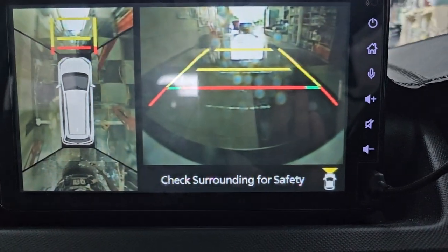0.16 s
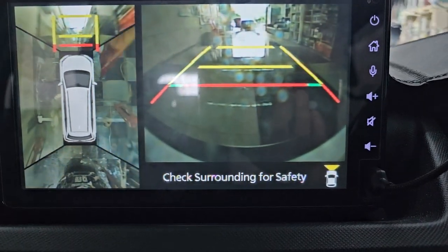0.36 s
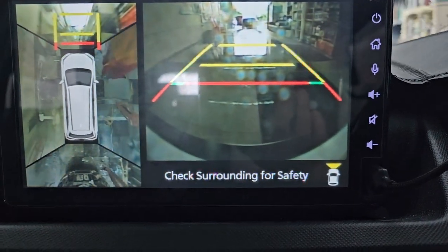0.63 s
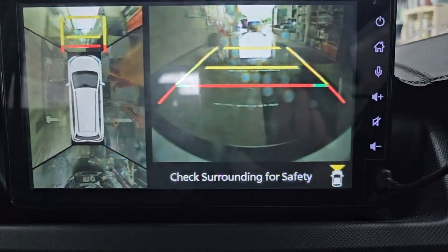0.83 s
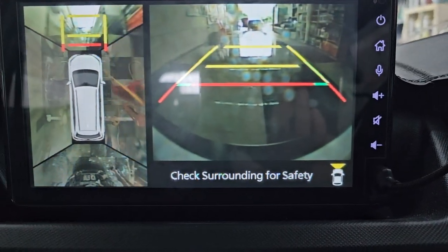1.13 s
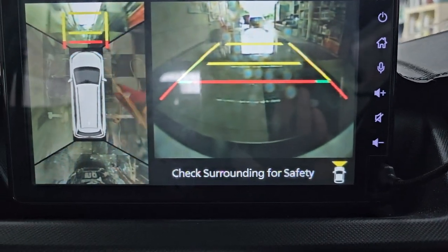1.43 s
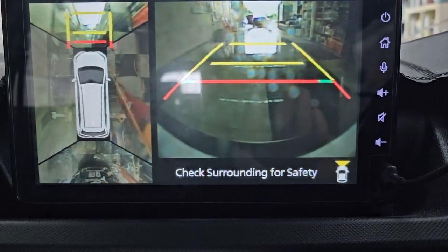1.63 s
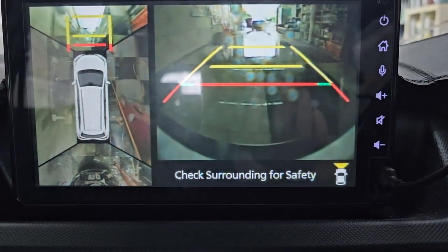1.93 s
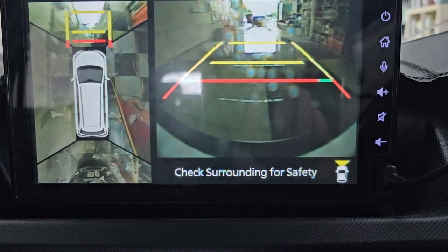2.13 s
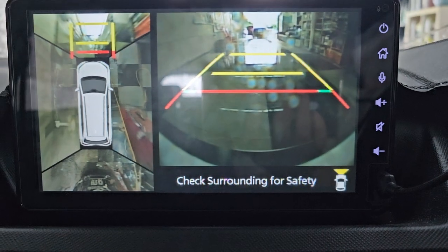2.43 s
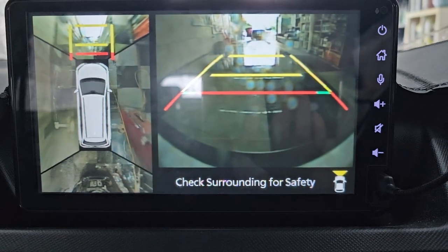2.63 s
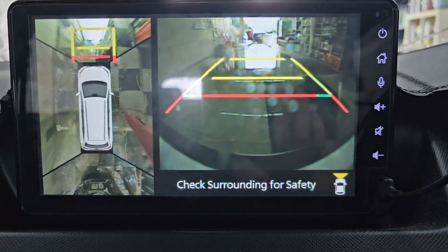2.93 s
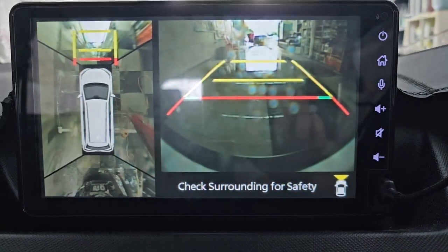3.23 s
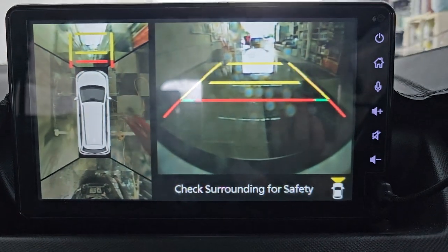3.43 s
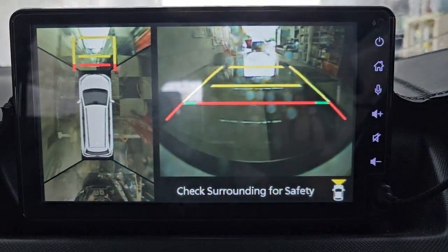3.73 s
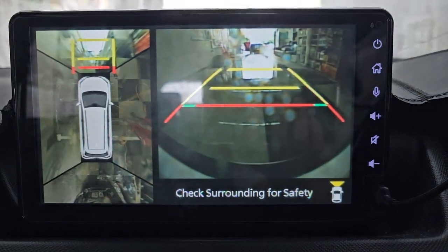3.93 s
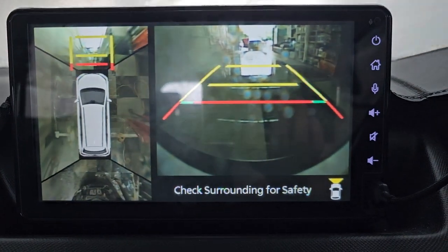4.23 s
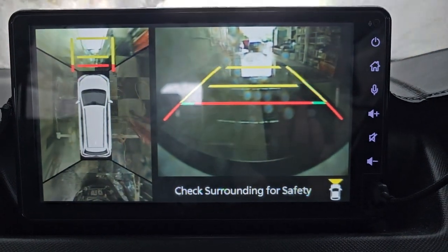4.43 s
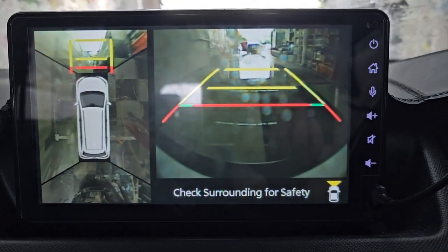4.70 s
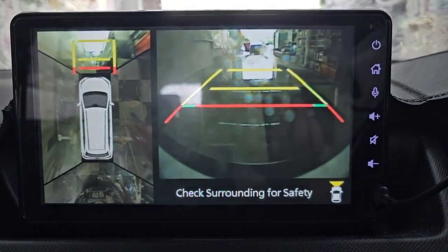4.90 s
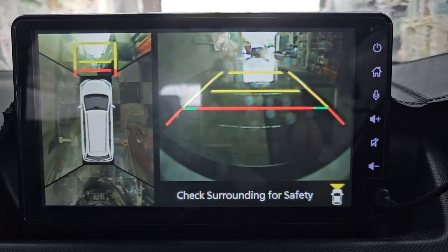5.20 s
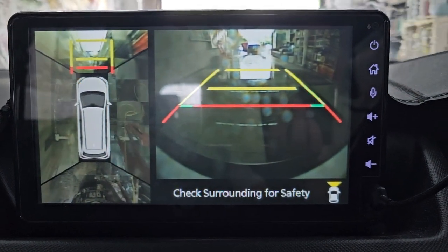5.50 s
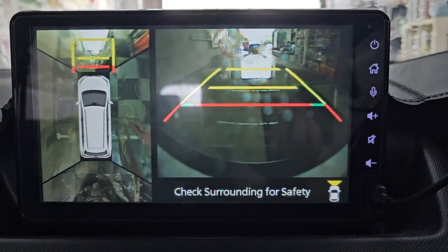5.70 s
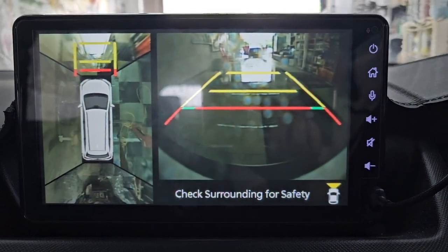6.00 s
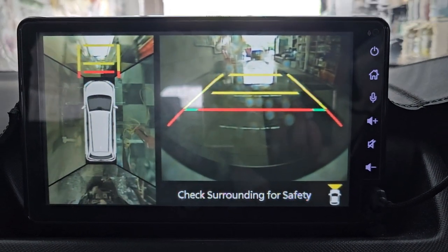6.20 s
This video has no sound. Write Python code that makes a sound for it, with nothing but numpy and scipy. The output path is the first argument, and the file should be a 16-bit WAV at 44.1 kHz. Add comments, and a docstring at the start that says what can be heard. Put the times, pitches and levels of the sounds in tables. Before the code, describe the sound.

Wet brushes scrub unevenly along a car, heard from the front seat with everything closed, their hiss mixed with dull booming from the panels and a few knocks. They pause for about a second, leaving the car wash's low rumble, a faint hum and cabin air. Close, bright swishes follow, then wet rubber briefly judders on the glass, and the scrubbing starts again over the continuing rumble.

```python
"""Inside a closed car in a car wash: a machine rumble, a faint hum and cabin air run throughout, made of noise and sines.
For the first three seconds wet brushes hiss over the car in uneven strokes, with brief bright swishes.
Random friction slips make the hiss, boom the doors and drone the windows; now and then a tuft catches and knocks.
After a pause, brighter swishes sweep close by, ending around a short rubbery judder of stick-slip kicks.
Then the brush strokes return until the end."""
import sys
import numpy as np
from scipy import signal
from scipy.fft import rfft, irfft, next_fast_len
from scipy.io import wavfile
from scipy.ndimage import uniform_filter1d, map_coordinates

SR = 44100
rng = np.random.default_rng(int(sys.argv[2]) if len(sys.argv) > 2 else 0)


def put_to_file(sound):
    """Save the sound as 16-bit audio at rate SR, in the file named by the first command-line argument."""
    columns = np.atleast_2d(sound).T  # one column per channel
    safe = np.clip(columns, -1, 1)
    whole_steps = np.round(safe * 32767)
    wavfile.write(sys.argv[1], SR, whole_steps.astype(np.int16))


N = 280035  # length in samples


def amp(db):
    """Turn decibels into gain."""
    return 10 ** (np.asarray(db) / 20)


def unit(x):
    """Scale a sound to an rms (average strength) of 1."""
    return x / np.sqrt(np.mean(x ** 2) + 1e-20)


def along(points, hz):
    """Read a curve of (pitch_hz, value) points on a log pitch axis."""
    point_hz, value = np.transpose(points)
    return np.interp(np.log(hz + 1), np.log(point_hz + 1), value)


def curves(rows):
    """Join the rows of a table by straight lines: one curve for each column after the time."""
    time_s, *columns = np.transpose(rows)
    return [np.interp(np.arange(N) / SR, time_s, column) for column in columns]


def wobble(rate):
    """A smooth random curve through `rate` random points a second."""
    points = rng.standard_normal(int(N * rate / SR) + 4)
    return map_coordinates(points, [np.arange(N) * rate / SR])


def filtered(x, response):
    """Multiply the spectrum of a sound by a response to each frequency."""
    size = next_fast_len(N + SR // 2)  # spare room so the tail does not wrap around
    return irfft(rfft(x, size) * response(np.fft.rfftfreq(size, 1 / SR)), size)[..., :N]


def coloured(x, spectrum):
    """Shape a sound with (pitch_hz, level_db) points."""
    return filtered(x, lambda hz: amp(along(spectrum, hz)))


def ringing(x, modes, low_hz, high_hz):
    """Shake a body that has (pitch_hz, width_hz, level_db) resonances and radiates between two soft band edges."""
    def response(f):
        body = 0
        for k, (hz, width, db) in enumerate(modes):
            resonance = 1j * f * width / (hz * hz - f * f + 1j * f * width)
            body = body + (-1) ** k * amp(db) * resonance  # neighbours have opposite signs
        band = 1 / np.sqrt((1 + (low_hz / (f + 1)) ** 8) * (1 + (f / high_hz) ** 8))
        return body * band
    return filtered(x, response)


def stereo(pair, alike, balance):
    """Mix two unrelated signals into left and right with a given likeness and balance, at rms 1 overall."""
    def spread(hz):
        turn = np.arccos(np.clip(along(alike, hz), -.98, .98)) / 2
        return np.array([np.cos(turn), np.sin(turn)])

    def lean(hz):
        tilt_db = along(balance, hz)
        return amp(np.array([tilt_db, -tilt_db]) / 2)

    mid, side = filtered(pair, spread)
    return unit(filtered(np.array([mid + side, mid - side]), lean))


def slips(rate, scatter_db):
    """Friction force: tiny slips of random size and sign, on average `rate` a second."""
    happens = rng.random((2, N)) < rate / SR
    sign = np.sign(rng.standard_normal((2, N)))
    return happens * sign * amp(scatter_db * rng.standard_normal((2, N)))


def held(x, grip):
    """Friction feeds a weak vibration and damps a strong one, which evens out its swing."""
    swing = np.sqrt(np.mean(np.abs(signal.hilbert(x)) ** 2, axis=0))
    smooth_swing = uniform_filter1d(swing, SR // 40)
    return unit(x / (smooth_swing + 1e-9) ** np.clip(grip, 0, 1))


# how the rumble's strength moves, before a small lift: start_s [s], level_db [dB]
RUMBLE_STRENGTH = [(0.05, -22), (0.45, -29.5), (0.9, -24), (1.75, -24), (2.3, -27.5), (2.95, -24.5),
                   (3.25, -29), (4.3, -27), (4.6, -24), (5.3, -27.5), (6.35, -29)]
# relative spectra of the rumble and of the cabin air: pitch_hz [Hz], level_db [dB per Hz]
RUMBLE_COLOUR = [(12, -50), (20, -31), (29, 7.5), (38, -2.5), (50, 6), (62, -0.5), (78, -0.5), (100, -12.5),
                 (130, -13.5), (200, -47), (600, -120)]
AIR_COLOUR = [(12, -20), (30, 34), (70, 28.5), (110, 30.5), (165, 15), (275, 18.5), (360, 8), (540, 7),
              (800, -0.5), (950, -7), (1400, -7.5), (2550, -16.5), (3600, -12.5), (7300, -15.5),
              (8800, -19.5), (15500, -24)]
# steady hum tones: pitch_hz [Hz], level_db [dB rms]
HUM_TONES = [(274.5, -61), (328.4, -58.5), (489.9, -64)]
# how alike left and right are: pitch_hz [Hz], likeness [correlation, -1 to 1]
MACHINE_ALIKE = [(40, 1), (200, 0.41), (600, 0.39), (1500, 0), (15000, 0)]
# how much louder left is than right: pitch_hz [Hz], left_over_right_db [dB]
MACHINE_BALANCE = [(30, -4.5), (60, -4.5), (110, -1), (200, -9), (300, 1), (4400, 1.5), (8000, -2),
                   (15000, 5)]
THROB_DB, THROB_RATE = 2.5, 22  # size of the random throb, its random points a second


def machinery():
    """Low noise throbs as the rumble, steady low-weighted noise is the cabin air, and sines make a faint hum."""
    rumble_db, = curves(RUMBLE_STRENGTH)
    rumble = stereo(coloured(rng.standard_normal((2, N)), RUMBLE_COLOUR), MACHINE_ALIKE, MACHINE_BALANCE)
    air = stereo(coloured(rng.standard_normal((2, N)), AIR_COLOUR), MACHINE_ALIKE, MACHINE_BALANCE)
    t = np.arange(N) / SR
    hum = 0
    for hz, db in HUM_TONES:
        phase = 2 * np.pi * hz * t + 0.76 * wobble(2.13)  # the pitch wavers slightly
        hum = hum + amp(db) * np.sqrt(2) * np.sin(phase)
    rumble_gain = amp(rumble_db + 0.43 + THROB_DB * wobble(THROB_RATE))
    return rumble_gain * held(rumble, grip=0.7) + amp(-34) * air + hum


# how hard the brush leans on the doors, before a small trim: start_s [s], boom_db [dB]
DOOR_LEAN = [(0.0, -37), (0.23, -32), (0.65, -26), (0.9, -37), (0.99, -19), (1.25, -28), (1.33, -17.5),
             (1.63, -38), (1.64, -22.5), (1.82, -22.5), (1.86, -28.5), (3.02, -23.5), (3.18, -50),
             (4.12, -36.5), (4.74, -20.5), (5.27, -26), (5.64, -21.5), (6.35, -28.5)]
# lowest door resonances: pitch_hz [Hz], width_hz [Hz], level_db [dB, relative]
DOOR_MODES = [(122.9, 14, 5), (158.4, 11.7, 0), (158.6, 75, -6)]
# left-right likeness of all brush rubbing: pitch_hz [Hz], likeness [correlation, -1 to 1]
BRUSH_ALIKE = [(130, 0.94), (305, 0.88), (420, 0.46), (540, 0.69), (800, 0.43), (980, -0.082), (1130, 0.18),
               (1400, -0.025), (1650, -0.085), (1950, 0.28), (2600, -0.07), (15000, 0.021)]
# left-right balance of all brush rubbing: pitch_hz [Hz], left_over_right_db [dB]
BRUSH_BALANCE = [(100, 0.5), (200, -0.5), (400, 3), (700, 0), (1300, 1), (4400, 0), (8000, 0), (11000, 2.5),
                 (15000, 6)]


def panels():
    """Heavy tufts drag unevenly over the doors, which boom at their lowest resonances."""
    boom_db, = curves(DOOR_LEAN)
    shaken = ringing(slips(500, scatter_db=6.5), DOOR_MODES, low_hz=81.6, high_hz=217)
    boom = stereo(shaken, BRUSH_ALIKE, BRUSH_BALANCE)
    return amp(boom_db - 1.46 + 2.8 * wobble(35)) * held(boom, grip=0.49)


def cabin(x, wet_db, t60):
    """Glass and trim add a short, dense echo, drifting slowly at random between two patterns; t60 is s per 60 dB."""
    t = np.arange(SR // 8) / SR
    echoes = rng.standard_normal((2, 2, len(t))) * amp(-60 * t / t60) * (t > .002)
    echoes /= np.linalg.norm(echoes, axis=2, keepdims=True)
    first_echo, second_echo = signal.fftconvolve(x[None], echoes, axes=2)[..., :N]
    blend = wobble(0.94)
    return unit(x + amp(wet_db) * (np.cos(blend) * first_echo + np.sin(blend) * second_echo))


def stroke(start, length, rise_s, fall_s, change_db=0):
    """Gain of one stroke: it swells, holds while the pressure drifts, and lets go; rise and fall are s per 20 dB."""
    t = np.arange(N) / SR - start
    edges = np.maximum(-t, 0) / rise_s + np.maximum(t - length, 0) / fall_s
    return amp(change_db * np.clip(t / length, 0, 1) - 20 * edges)


# close sweeps, before the fixed lifts of the fizz and the hollow layer: start_s [s], length_s [s],
# fizz_db [dB], rasp_over_fizz_db [dB], hollow_over_fizz_db [dB]
CLOSE_SWEEPS = [(0.01, 0.028, -45.5, -6.5, -4), (0.118, 0.05, -45.5, -18, -13),
                (0.767, 0.07, -47, -11, -13), (1.38, 0.052, -43.5, -13, -17), (4.046, 0.03, -43.5, -10, -8),
                (4.071, 0.033, -37.5, -10, -2), (4.142, 0.01, -41, -9, -8), (4.19, 0.14, -50.5, -2.5, -3),
                (4.358, 0.15, -39, -4, 0), (4.527, 0.066, -36.5, 1, -1), (4.652, 0.099, -36.5, -4.5, 2)]
# relative spectra of the fine fizz and of the rasp: pitch_hz [Hz], level_db [dB per Hz]
FIZZ_COLOUR = [(500, -19), (800, 6), (1050, 1.5), (2500, -6.5), (3200, -5.5), (4900, -4.5), (5400, 3),
               (7600, 1), (8300, 2), (12500, -5), (15500, -1.5)]
RASP_SPECTRUM = [(600, -45), (1200, -13), (2500, -14.5), (3100, -9), (4400, -8), (6000, -17), (9000, -21)]
# resonances of the hollow panel: pitch_hz [Hz], width_hz [Hz], level_db [dB, relative]
HOLLOW_MODES = [(259, 51, 2), (377, 134, -8), (468, 85, -3), (634, 117, -7), (793, 59, -7.5),
                (1043, 58, -16), (1250, 52, -18), (1564, 92, -18), (2020, 360, -30)]
# left-right likeness of the sweeps: pitch_hz [Hz], likeness [correlation, -1 to 1]
SWEEP_ALIKE = [(250, 0.8), (500, 0.39), (820, -0.16), (1250, -0.78), (2000, 0.0021), (15000, -0.11)]
# left-right balance of the sweeps: pitch_hz [Hz], left_over_right_db [dB]
SWEEP_BALANCE = [(800, 0.5), (5000, 0), (8000, -2), (11000, 1), (15000, 6)]
SWISH_RISE_S, SWISH_FALL_S = 0.047, 0.13  # time for 20 dB


def swish():
    """Fine bristles fizz and rasp in close, bright sweeps, over slips that ring a hollow panel."""
    fizz = coloured(cabin(slips(9000, scatter_db=6.0), wet_db=-1.5, t60=0.027), FIZZ_COLOUR)
    rasp = coloured(slips(6000, scatter_db=5.0), RASP_SPECTRUM)
    hollow = ringing(slips(1500, scatter_db=0.0), HOLLOW_MODES, low_hz=177, high_hz=2800)
    sweeps = []
    for start, length, fizz_db, rasp_db, hollow_db in CLOSE_SWEEPS:
        layer_gains = amp([fizz_db, fizz_db + rasp_db, fizz_db + hollow_db])
        sweeps.append(np.outer(layer_gains, stroke(start, length, SWISH_RISE_S, SWISH_FALL_S)))
    fizz_gain, rasp_gain, hollow_gain = np.max(sweeps, axis=0)  # each layer's loudest sweep of the moment
    sweep = (fizz_gain * amp(6) * stereo(fizz, SWEEP_ALIKE, SWEEP_BALANCE)
             + rasp_gain * unit(rasp)
             + hollow_gain * amp(7.5) * stereo(hollow, SWEEP_ALIKE, SWEEP_BALANCE))
    return amp(0.68 * wobble(67)) * sweep


# tufts that catch and let go, before a fixed trim: start_s [s], level_db [dB], pitch_hz [Hz]
TUFT_CATCHES = [(0.225, -4.5, 310.5), (0.471, -7.5, 318), (0.674, -15, 358), (0.735, -4.5, 289),
                (1.044, -6.5, 139.6), (1.326, -10, 131.5), (1.451, -10.5, 136.5), (1.611, -18, 360),
                (2.294, -12.5, 135.5), (2.609, -13.5, 123), (4.078, -21.5, 264), (4.744, -12.5, 518)]
# what a catch rings with: pitch_ratio [times its pitch], level_db [dB], decay_s [s for 60 dB]
KNOCK_MODES = [(1.001, 10.5, 0.082), (1.24, -17, 0.5), (1.65, 9, 0.0065)]


def catches():
    """A tuft sticks, lets go and leaves the panel ringing as a few fading sines."""
    out, t = np.zeros(N + SR), np.arange(SR // 3) / SR
    for start, db, hz in TUFT_CATCHES:
        ring = 0
        for ratio, mode_db, decay_s in KNOCK_MODES:
            ring = ring + amp(mode_db - 60 * t / decay_s) * np.sin(2 * np.pi * hz * ratio * t)
        soft_start = 1 - np.exp(-t / 0.0077)
        out[round(start * SR):][:len(t)] += amp(db - 6.5) * ring * soft_start
    return out[:N]


# brush strokes along the body, before each layer's own gain: start_s [s], length_s [s], pressure_db [dB],
# pressure_change_db [dB over the stroke], drone_over_pressure_db [dB]
BRUSH_STROKES = [(0.226, 0.069, -40.5, 2, 17), (0.314, 0.2, -38, 1.5, 16), (0.542, 0.13, -39, 0, 12.5),
                 (0.668, 0.062, -38, -1, 17.5), (0.91, 0.067, -48.5, 5, 13), (1.027, 0.47, -38.5, -5.5, 13),
                 (1.333, 0.17, -42, -0.5, 12.5), (1.631, 0.22, -42.5, -3.5, 14.5),
                 (2.158, 0.17, -42.5, 2.5, 13), (2.388, 0.069, -45, 0, 7.5), (2.898, 0.12, -44.5, -4, 13),
                 (5.059, 0.24, -45.5, 4, 11.5), (5.31, 0.1, -45, 0.5, 12.5), (5.471, 0.2, -38, 1.5, 10.5),
                 (5.71, 0.18, -40, 1, 11.5), (5.893, 0.57, -37.5, -0.5, 10)]
# light contact between strokes: start_s [s], length_s [s], pressure_db [dB]
LIGHT_PASSES = [(0.245, 2.795, -51), (4.8, 1.55, -48.5)]
LIGHT_DRONE_DB = 10  # drone_over_pressure_db of the light contact
STROKE_RISE_S, STROKE_FALL_S = 0.13, 0.13  # time for 20 dB


def pressure(rise_s, fall_s, drone=False):
    """Gain of the firmest brush contact of the moment, weighted for the windows if drone is set."""
    contacts = []
    for start, length, db, change_db, drone_db in BRUSH_STROKES:
        contacts.append(amp(db + drone * drone_db) * stroke(start, length, rise_s, fall_s, change_db))
    for start, length, db in LIGHT_PASSES:
        contacts.append(amp(db + drone * LIGHT_DRONE_DB) * stroke(start, length, rise_s, fall_s=0.11))
    return np.max(contacts, axis=0)


# window resonances, the low drone and the upper modes: pitch_hz [Hz], width_hz [Hz], level_db [dB, relative]
DRONE_MODES = [(182.4, 25, -2), (255.3, 17.6, -2.5), (297.6, 31.5, -0.5), (388, 87, -8), (458.4, 85, -7),
               (548.5, 58, -7), (658, 57, -12.5)]
SCRUB_MODES = [(770, 218, -2.5), (1038, 79, -2.5), (1233, 89, -7), (1409, 48, 0.5), (1605, 79, -7),
               (1956, 51, -8.5), (2240, 52, -10), (2820, 61, -11), (3850, 87, -15)]
DRONE_RISE_S, DRONE_FALL_S = 0.089, 0.092  # time for 20 dB
FIRM_DB, SCRUB_DB, SCRUB_GROWS = -38, -31, 1.47  # a firm pressure, the scrub there, its dB per dB of pressure


def windows():
    """Coarse slips make the glass drone; finer ones ring its upper modes, more so under firm pressure."""
    flutter = wobble(45)  # tufts arrive unevenly
    low_ring = ringing(slips(1300, scatter_db=3.0), DRONE_MODES, low_hz=134, high_hz=850)
    drone = held(stereo(low_ring, BRUSH_ALIKE, BRUSH_BALANCE), grip=0.72)
    high_ring = ringing(slips(3000, scatter_db=2.5), SCRUB_MODES, low_hz=575, high_hz=4500)
    scrub = stereo(high_ring, BRUSH_ALIKE, BRUSH_BALANCE)
    firmness = pressure(STROKE_RISE_S, STROKE_FALL_S) / amp(FIRM_DB)
    drone_gain = pressure(DRONE_RISE_S, DRONE_FALL_S, drone=True) * amp(1.7 + 1.4 * flutter)
    scrub_gain = firmness ** SCRUB_GROWS * amp(SCRUB_DB + 0.29 * flutter)
    return drone_gain * drone + scrub_gain * scrub


# relative spectrum of the bristle hiss: pitch_hz [Hz], level_db [dB per Hz]
HISS_COLOUR = [(150, -40), (450, 5.5), (900, -0.5), (1130, 0), (1400, -1), (2150, 0), (2500, -4),
               (3100, -2.5), (4500, -2), (6900, -6.5), (7450, -5.5), (8500, -8.5), (13000, -13),
               (15700, -15)]


def bristles():
    """Countless wet bristle tips slip and hiss along the body, louder as the brush presses harder."""
    fine = cabin(slips(12000, scatter_db=2.5), wet_db=-10, t60=0.044)
    hiss = stereo(coloured(fine, HISS_COLOUR), BRUSH_ALIKE, BRUSH_BALANCE)
    return pressure(STROKE_RISE_S, STROKE_FALL_S) * amp(6 + 0.63 * wobble(45)) * hiss


def during(rows):
    """1 while a table's curve runs, 0 outside it, with soft edges."""
    t = np.arange(N) / SR
    running = (t > rows[0][0] - .03) & (t < rows[-1][0])
    return uniform_filter1d(running.astype(float), SR // 30)


# wet rubber on glass, before random jitter and a small lift: start_s [s], slip_rate [a second], level_db [dB]
RUBBER_JUDDER = [(4.64, 160, -37), (4.655, 175, -25), (4.69, 170, -24.5), (4.72, 137, -18.5),
                 (4.737, 125, -26), (4.755, 140, -23.5), (4.81, 71, -40)]
# resonances as the rubber bites, then as it drags: pitch_hz [Hz], width_hz [Hz], level_db [dB, relative]
RUBBER_BITE = [(518, 23, 6.5), (865, 33, 0), (1045, 65, -11), (2600, 44, -16)]
RUBBER_DRAG = [(264, 39, -12), (407, 33, 4), (506, 38, 4), (600, 37, -11), (860, 49, -11.5),
               (1575, 76, -22), (2347, 50, -22)]


def judder():
    """Wet rubber sticks and slips on the glass at an uneven rate; its tone drops from bite to drag."""
    rate, level_db = curves(RUBBER_JUDDER)
    cycles = np.cumsum(rate * np.exp(0.11 * wobble(70))) / SR
    kicks = np.diff(np.floor(cycles), prepend=0) * amp(1.3 * wobble(110))  # one kick per whole cycle
    force = unit(kicks) + .5 * rng.standard_normal((2, N))
    dragging = np.interp(np.arange(N) / SR, [4.665, 4.70], [0, 1])
    bite = held(ringing(force, RUBBER_BITE, low_hz=300, high_hz=3000), grip=0.72)
    drag = held(ringing(force, RUBBER_DRAG, low_hz=200, high_hz=3000), grip=0.96)
    rubber = np.sqrt(1 - dragging) * bite + np.sqrt(dragging) * drag
    return during(RUBBER_JUDDER) * amp(level_db + 1.5) * rubber


def scene():
    """Add up everything heard from the front seat."""
    return machinery() + panels() + windows() + bristles() + swish() + catches() + judder()


# two treble notches of the right microphone port: pitch_hz [Hz], level_db [dB]
RIGHT_PORT_COLOUR = [(7000, 0), (7600, 0.5), (8700, -9), (10000, -2), (11200, 0), (12600, -3), (15000, 2.5)]
TOP_HZ = 15780  # upper band limit


def record(dry):
    """The right microphone port colours the treble, and both channels stop at the band limit."""
    right = coloured(dry[1], RIGHT_PORT_COLOUR)
    return filtered(np.array([dry[0], right]), lambda hz: hz < TOP_HZ)


dry = scene()
out = record(dry)
put_to_file(out)
```